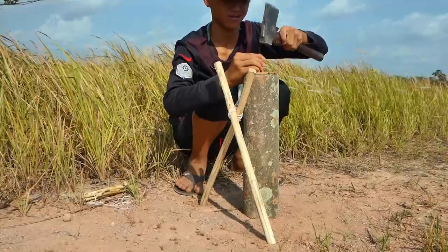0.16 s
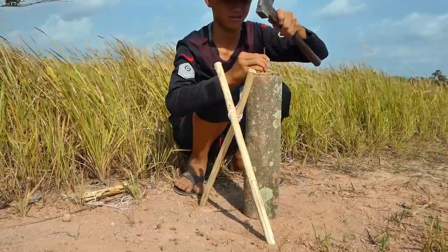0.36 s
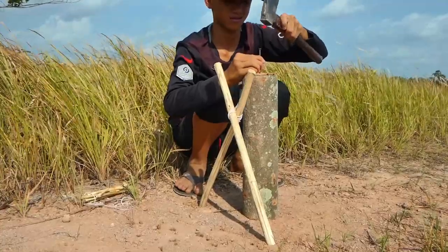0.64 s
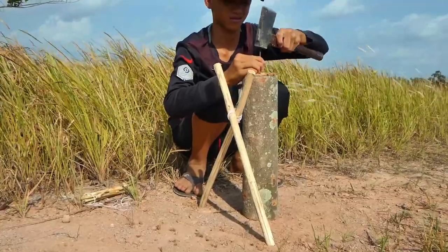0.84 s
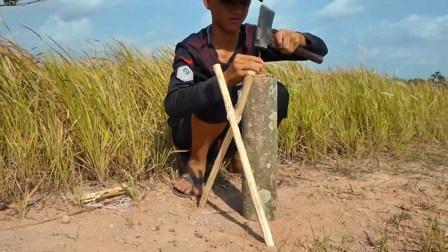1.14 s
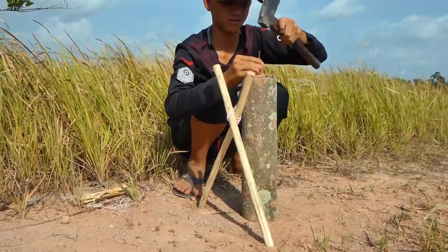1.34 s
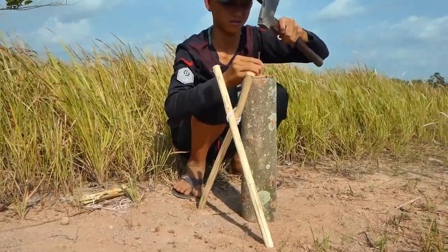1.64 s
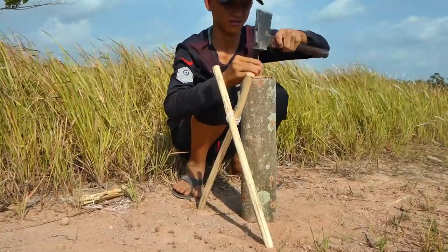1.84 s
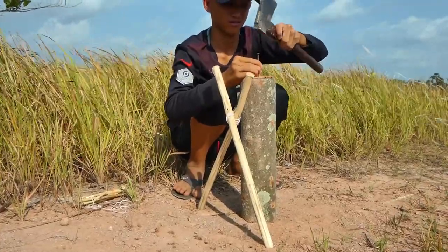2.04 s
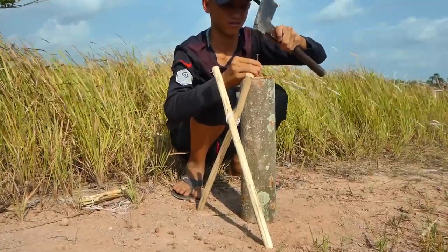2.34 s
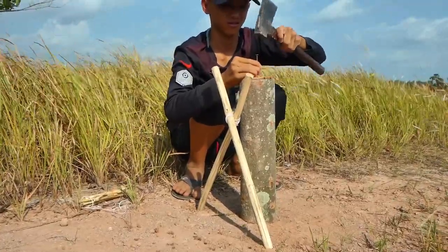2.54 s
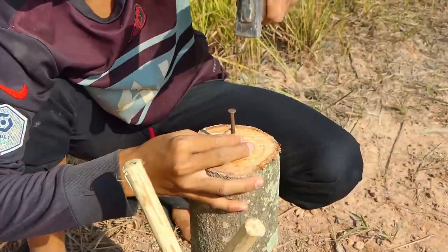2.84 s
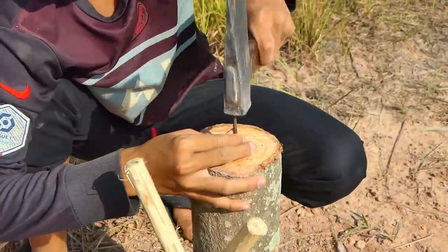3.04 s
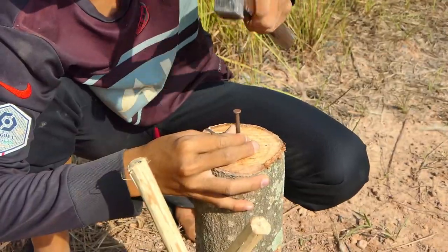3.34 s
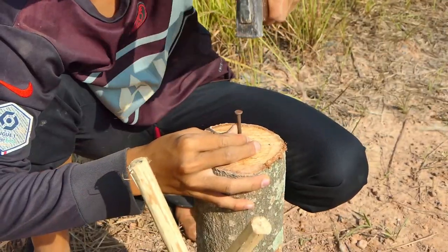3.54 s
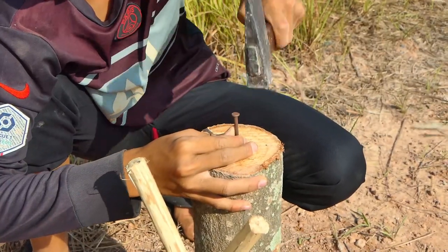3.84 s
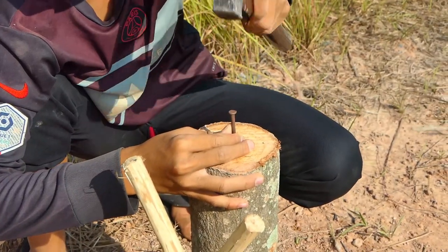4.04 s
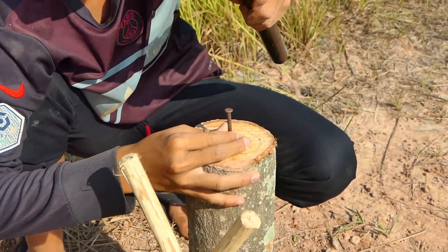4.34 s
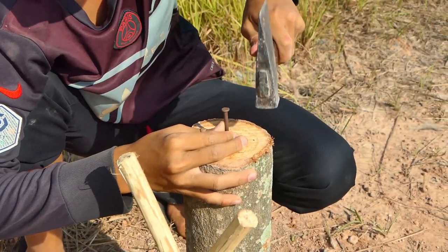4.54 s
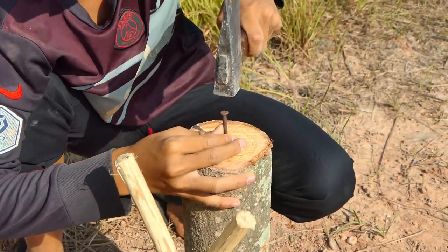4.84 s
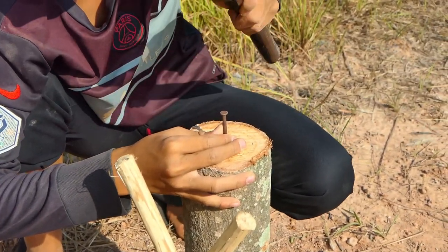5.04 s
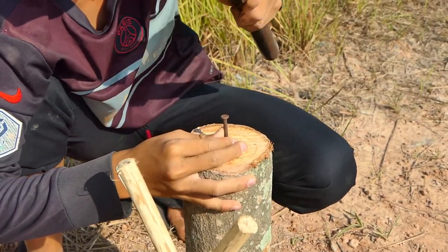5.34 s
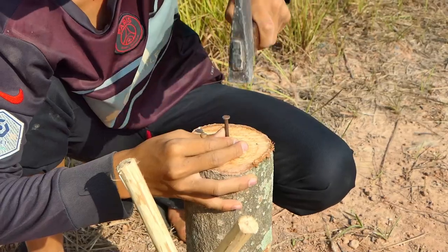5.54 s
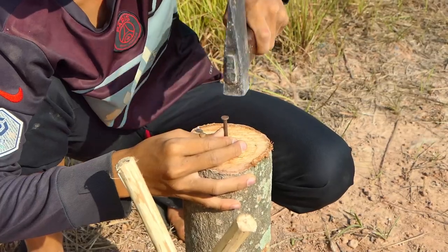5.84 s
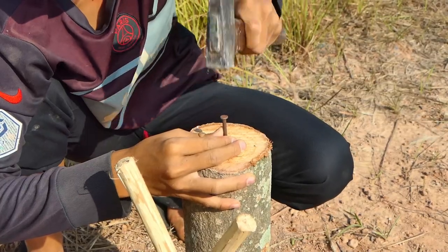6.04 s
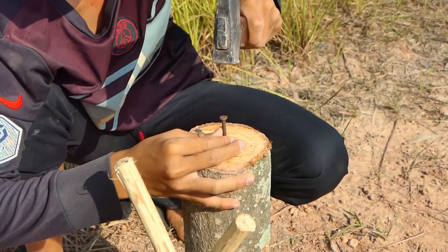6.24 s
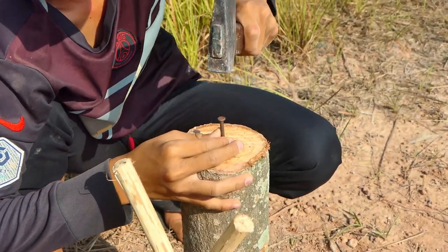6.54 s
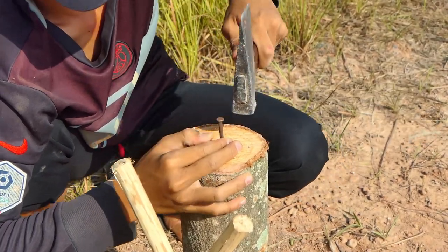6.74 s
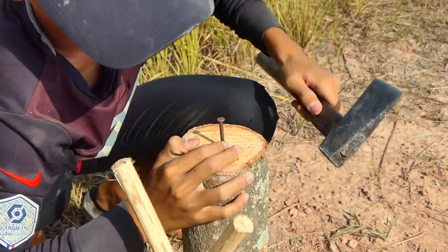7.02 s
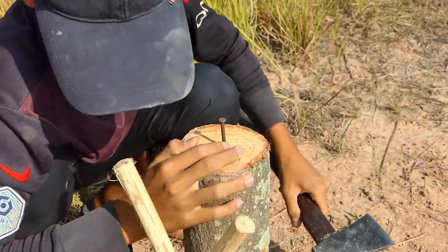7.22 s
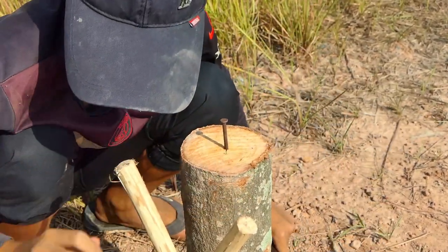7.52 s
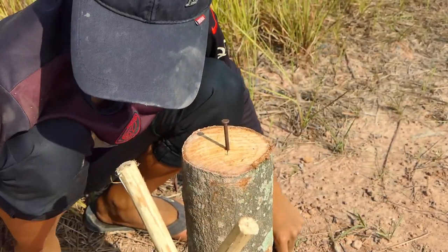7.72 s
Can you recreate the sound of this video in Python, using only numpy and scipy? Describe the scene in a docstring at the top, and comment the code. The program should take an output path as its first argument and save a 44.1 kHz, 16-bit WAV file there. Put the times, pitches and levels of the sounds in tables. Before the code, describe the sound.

A small axe hammers a nail into a log with steady, ringing blows while wind buffets the microphone and grass hisses.

```python
"""Hammering a nail in a windy field

The back of a small steel axe drives a nail into an upright log, heard first from some steps away,
then close. Each blow cracks, and axe and log ring briefly. Wind rubs the tall grass into a hiss and
buffets the two microphone openings. A soft brushing and a few faint ticks follow the last blow."""
import sys
import numpy as np
from scipy import signal
from scipy.fft import rfft, irfft, next_fast_len
from scipy.io import wavfile
from scipy.ndimage import uniform_filter1d, map_coordinates

SR = 44100
rng = np.random.default_rng(int(sys.argv[2]) if len(sys.argv) > 2 else 0)


def dump_mix(stems):
    """Bounce the given channels to the path in sys.argv[1] as a 16-bit WAV at rate SR."""
    frames = np.atleast_2d(stems).T  # one column per channel
    limited = np.clip(frames, -1, 1)  # hard clip at full scale
    pcm = np.round(limited * 32767).astype(np.int16)
    wavfile.write(sys.argv[1], SR, pcm)


N = 347508
CLOSE_FROM_S = 2.84  # the scene is heard from afar before this time, from close by after it


def amp(db):
    """Turn decibels into a factor to multiply by."""
    return 10 ** (np.asarray(db) / 20)


def unit(x):
    """Scale a signal so that its average strength (rms) is 1."""
    return x / np.sqrt(np.mean(x ** 2) + 1e-20)


def along(points, hz):
    """Read between (frequency, value) points, with every octave equally wide."""
    f, values = np.transpose(points)
    return np.interp(np.log(hz + 1), np.log(f + 1), values)


def over_time(points):
    """Join (time, value) points with straight lines, giving one value per sample."""
    times, values = np.transpose(points)
    return np.interp(np.arange(N) / SR, times, values)


def wobble(rate):
    """Two smooth random curves, each passing through `rate` random values a second."""
    knots = rng.standard_normal((2, int(N * 200 / SR)))
    coarse = np.arange(0, N + 32, 32)
    smooth = [map_coordinates(row, [coarse * min(rate, 190) / SR]) for row in knots]
    return np.array([np.interp(np.arange(N), coarse, row) for row in smooth])


def filtered(x, response):
    """Make each frequency in x louder or softer by the factor response(hz)."""
    size = next_fast_len(x.shape[-1] + 8192)
    return irfft(rfft(x, size) * response(np.fft.rfftfreq(size, 1 / SR)), size)[..., :x.shape[-1]]


def shortest_click(gain_db):
    """The shortest click that has these levels at evenly spaced frequencies (minimum phase)."""
    cepstrum = irfft(gain_db * np.log(10) / 20)
    half = len(cepstrum) // 2
    cepstrum[1:half] *= 2
    cepstrum[half + 1:] = 0
    return irfft(np.exp(rfft(cepstrum)))


def sum_and_difference(a, b):
    """Turn mid (what both ears share) and side (how they differ) into left and right, or back."""
    return np.array([a + b, a - b])


def grass():
    """Blades of grass rub together in the wind: a wide, slightly patchy hiss."""
    # how the hiss swells and fades: t/s, relative level/dB
    loudness = [(0, -52.5), (.24, -52.5), (.4, -61.5), (.58, -53.5), (1.1, -52), (1.7, -55), (1.84, -62.5),
                (1.95, -59), (2.16, -64), (2.45, -56.5), (2.72, -53), (2.8, -56.5), (2.88, -63.5),
                (3.6, -67.5), (4.4, -64.5), (4.9, -69), (5.8, -66), (6.2, -69.5), (7.2, -66.5), (7.88, -67)]
    # tone of the hiss: f/Hz, level/dB
    tone = [(60, -20), (150, -6.5), (500, -2), (1200, -1), (3000, -4.5), (6500, -7), (8300, -11.5),
            (10500, -10.5), (12500, -18.5), (15000, -26), (16500, -48)]
    # how alike left and right are: f/Hz, likeness (1 = the same)
    likeness = [(300, 1), (1400, 0.36), (3100, .6), (6800, 0.7), (15000, 0.1874)]

    def mid_side_gain(hz):
        angle = np.arccos(along(likeness, hz)) / 2
        return amp(along(tone, hz)) * [np.cos(angle), np.sin(angle)]

    spectrum = signal.stft(rng.standard_normal((2, N)), nperseg=512)[2]
    patches = uniform_filter1d(rng.standard_normal(spectrum.shape[1:]), size=6, axis=0)  # over pitch
    patches = uniform_filter1d(patches, size=12, axis=1)  # over time
    patchy_noise = signal.istft(spectrum * amp(1.1 * unit(patches)), nperseg=512)[1][:, :N]
    hiss = unit(sum_and_difference(*filtered(patchy_noise, mid_side_gain)))
    # from afar, in the grass, the highest treble is stronger
    treble = filtered(hiss, lambda hz: 1 / (1 + (11500 / (hz + 1)) ** 8))
    afar = np.arange(N) < CLOSE_FROM_S * SR
    return amp(over_time(loudness) + 3.5) * (hiss + 0.5 * treble * afar)


def rumble(gust_db):
    """The deepest air movement is smooth and follows the gusts only in part."""
    # tone of the slow pressure swings: f/Hz, level/dB
    tone = [(15, -42.5), (30, -24), (60, -7), (90, 1.5), (130, -1), (200, -29), (400, -82)]
    mid, side = filtered(rng.standard_normal((2, N)), lambda hz: amp(along(tone, hz)))
    return amp(0.66 * gust_db - 19.5) * unit(sum_and_difference(mid, 0.22 * side))


def buffeting(gust_db):
    """Air swirls at each microphone opening; the two are mixed, alike in the bass, opposed above."""
    # strong swirls of air: t/s, left boost/dB, right boost/dB
    swirls = [(0.12, 22.5, 12), (0.302, 4.5, 5), (0.373, 10, 5), (0.42, 5.5, 2.5), (1.539, 5, 10.5),
              (1.804, 10, 5), (2.014, 7.5, 4.5), (2.076, 5, 7.5), (2.179, 7.5, 2), (3.07, 7, 6),
              (3.194, 12, 2.5), (3.28, 10.5, 16.5), (3.399, 3.5, 6.5), (3.473, 5, 14), (3.678, 7, 6.5),
              (3.957, 6.5, 4), (4.45, 12, 5.5), (4.712, 7, 9), (5.71, 12.5, 9), (5.955, 9.5, 6.5),
              (6.138, 16.5, 4), (6.751, 3, 9), (7.288, 5, 10), (7.779, 4, 4.5)]
    # tone of left plus right: f/Hz, level/dB
    mid_tone = [(20, -61.5), (40, -35), (80, -12.5), (150, 1.5), (290, -5), (480, -17), (700, -25),
                (1300, -38.5), (3000, -62.5), (7000, -92)]
    # tone of left minus right: f/Hz, level/dB
    side_tone = [(20, -69), (35, -41.5), (130, -7.5), (260, -8.5), (400, -13), (650, -16), (1000, -26),
                 (3000, -53.5), (7000, -92.5)]
    t, swirl_s = np.arange(N) / SR, 0.011
    churn = 0.32 * wobble(7.3).mean(0) + 0.36 * wobble(17) + 0.78 * wobble(65)
    lumps_db = 6.27 * np.tanh(churn)  # the churning swells only so far
    for s, left_db, right_db in swirls:
        near = slice(max(round((s - .06) * SR), 0), round((s + .06) * SR))
        lumps_db[:, near] += np.exp(-((t[near] - s) / swirl_s) ** 2) * [[left_db], [right_db]]
    tone = lambda hz: amp([along(mid_tone, hz), along(side_tone, hz)])
    highs = lambda hz: 1 / (1 + (430 / (hz + 1)) ** 6)
    strength = lambda gain: np.sqrt(2 * np.mean(gain ** 2))
    grid_hz = np.fft.rfftfreq(4096, 1 / SR)
    large_swirls = amp(gust_db + lumps_db - 2.5) * rng.standard_normal((2, N))
    boom = filtered(sum_and_difference(*large_swirls), lambda hz: tone(hz) * (1 - highs(hz)))
    boom /= strength(tone(grid_hz)[0])
    # small, fast swirls come in sharper bursts than the large ones
    flutter_db = -66.5 + 1.42 * (gust_db + 40) + 1.13 * lumps_db + 5.17 * wobble(170)
    small_swirls = amp(flutter_db) * rng.standard_normal((2, N))
    flutter = filtered(sum_and_difference(*small_swirls), lambda hz: tone(hz) * highs(hz))
    flutter /= strength(tone(grid_hz)[1] * highs(grid_hz))
    return sum_and_difference(*(boom + flutter))


def brushing():
    """Something brushes nearby: a rough noise that swells quickly and fades more slowly."""
    t = np.arange(N) / SR
    peak_s, swell_s, fade_s = 7.042, 0.022, 0.12
    loudness = amp(-60.5) * np.exp(-np.maximum((peak_s - t) / swell_s, (t - peak_s) / fade_s))
    rough_noise = rng.standard_normal(N) * amp(3 * wobble(80)[0])
    brush = filtered(rough_noise, lambda hz: 1 / (1 + (np.log2((hz + 1) / 2100) / 0.87) ** 4))
    return loudness * unit(brush)


def faint_ticks():
    """A few faint ticks after the last blow, each a quickly dying tone mixed with noise."""
    # the ticks: t/s, relative level/dB, f/Hz
    ticks = [(6.8233, -50, 4430), (6.951, -51, 2700), (7.046, -47, 2400), (7.497, -36, 1800),
             (7.824, -46, 1550)]
    out, t = np.zeros(N), np.arange(SR // 20) / SR
    for s, db, hz in ticks:
        noisy_tone = np.sin(2 * np.pi * hz * t) + 0.48 * rng.standard_normal(len(t))
        out[round(s * SR):][:len(t)] += amp(db - 6.5 - 60 * t / 0.016) * noisy_tone
    return filtered(out, lambda hz: 1 / (1 + (hz / 7500) ** 6))


def crack_and_scatter(t, close, crack_db, dullness):
    """The sharp crack of steel on the nail, and its short scatter off the ground and grass."""
    # tone of the crack, one list from afar and one from close by: f/Hz, level/dB
    tones = [
        [(350, -42), (600, -13.5), (1000, -25.5), (1700, 0.5), (2500, -7.5), (3400, -2.5), (4600, -0.5),
         (5400, -0.5), (6800, -9), (8600, -2.5), (10500, -11), (13400, -14), (16000, -35)],
        [(350, -29.5), (600, -12.5), (1200, -14.5), (1600, -19), (2400, -10.5), (3000, -5), (3700, -3),
         (4700, -5), (5800, -9), (7100, -8), (8600, -11.5), (10000, -8), (11500, -14.5), (16000, -31)],
    ]
    hz = np.fft.rfftfreq(1024, 1 / SR)
    click = shortest_click(along(tones[close], hz) - dullness * np.log2((hz + 300) / 7000))
    click /= np.linalg.norm(click)
    fade = lambda db, fade_s: amp(db - 60 * t / fade_s)  # drops 60 dB in fade_s
    crack_shape = fade(-3, 0.0077) + fade(-11.5, 0.019) + fade(-27.5, 0.1)
    scatter_shape = fade(-23.5, 0.01596) + fade(-32.5, 0.094)
    rise = 1 - np.exp(-t / 0.00047)
    bursts = rng.standard_normal((2, len(t))) * rise * [crack_shape, scatter_shape]
    return amp(crack_db + dullness + 9.5) * signal.fftconvolve(bursts, [click], axes=1)[:, :len(t)]


def ringing(t, close, crack_db, low_hz, low_db, high_db, ping_db, clink_db, tick_db):
    """The struck axe and log shake at their own pitches, and each pitch quickly dies away."""
    # tones of axe and log, in ten groups: f/Hz, level/dB, time to fade by 60 dB/s, rise time/s
    groups = [
        [(3600, -12, .02, 0.00056), (5220, -16.5, 0.028, 0.000501), (8640, -13.5, 0.028, .0005)],
        [(1040, -2, 0.061, 0.0041), (1010, -15.5, 0.0247, 0.00551), (1097, -9.5, 0.037, 0.00087)],
        [(2032, 0.5, 0.041, 0.00074)],
        [(3050, 1.5, .04, .0005)],
        [(3350, 0.5, 0.034, 0.00066), (3360, 2, 0.022, .0004)],
        [(4516, -1, 0.043, 0.00088), (4525, -4.5, .025, .0005), (4570, -23, 0.1002, .002)],
        [(10000, 0, .2, .002)],
        [(165, 2.5, 0.036, 0.0064), (279, -3.5, 0.036, 0.00229)],
        [(2996, 2, 0.012, 0.000296), (2745, -4, 0.0057, 0.0003)],
        [(10040, 5, 0.0042, 0.00023)],
    ]
    # offsets for the groups that follow other levels, one row from afar and one from close by:
    # 2 kHz ring/dB, 3 kHz ring/dB, 3.3 kHz ring/dB, thud/dB
    offsets = [(-4, -27, -5, 10.5), (-8, -14, -7.5, -7)]
    ring_2k, ring_3k, ring_3k3, thud = offsets[close]
    group_levels = [crack_db, low_db, (crack_db + low_db) / 2 + ring_2k, clink_db + ring_3k,
                    crack_db + ring_3k3, high_db, ping_db, crack_db + thud, clink_db, tick_db]
    bends = np.ones(len(groups))
    bends[1] = low_hz / groups[1][0][0]  # the low ring moves with the hand's pressure
    tones = [(hz * bend, db + group_db, fade_s, rise_s)
             for bend, group_db, group in zip(bends, group_levels, groups)
             for hz, db, fade_s, rise_s in group]
    # the grip on axe and log shifts each tone a little from blow to blow
    level_noise, pitch_noise = rng.standard_normal((2, len(t)))
    ring = np.zeros(len(t))
    for k, (hz, db, fade_s, rise_s) in enumerate(tones):
        loudness = amp(db + 0.401 * level_noise[k] - 60 * t / fade_s) * (1 - np.exp(-t / rise_s))
        ring += loudness * np.sin(2 * np.pi * hz * (1 + 0.0044 * pitch_noise[k]) * t)
    roughness_db = 1.86 * unit(uniform_filter1d(level_noise, size=130))  # from loose contact
    return ring * amp(roughness_db)


def hammering():
    """Each time the axe meets the nail, it cracks and sets axe and log ringing."""
    # the contacts, with relative levels: t/s, crack/dB, dullness/(dB per octave), low ring f/Hz,
    # low ring/dB, high ring/dB, 10 kHz ping/dB, clink/dB, tick/dB
    blows = [(0.138, -27.5, 2.5, 994, -31.5, -22.5, -45, -25.5, -28),
             (0.559, -29.5, -4.5, 1030, -37.5, -35, -65, -32, -26),
             (0.904, -27.5, 3, 1010, -36.5, -20, -66, -28, -34),
             (1.244, -26.5, 0.5, 1030, -34.5, -26, -53, -23.5, -35),
             (1.5744, -25.5, 1, 1048, -35.5, -29.5, -70, -29, -39),
             (1.884, -30, 0, 1050, -34.5, -48, -58, -33, -46),
             (2.187, -32.5, 0.5, 1036, -40, -35, -60, -43, -47),
             (2.4821, -24, 1, 1010, -33.5, -28.5, -52, -26.5, -35),
             (2.768, -22, 0.5, 1016, -27, -30, -54, -30, -34),
             (2.8132, -60, 0, 1039, -33, -60, -72, -60, -55),
             (3.138, -21.5, 1, 1055, -23, -29, -67, -12.5, -16),
             (3.4878, -24, -1.5, 1040, -23, -34, -70, -19.5, -23),
             (3.8408, -22.5, 0, 1060, -25.5, -47, -64, -12, -18.5),
             (4.1899, -22, -1.5, 1050, -22, -24.5, -56, -15.5, -18),
             (4.5208, -23, 1.5, 1026, -29.5, -20.5, -63, -26, -15),
             (4.5657, -49, 11, 1055, -12, -56, -69, -24.5, -69),
             (4.8757, -26, 1.5, 1080, -20.5, -34, -62, -18, -22.5),
             (5.204, -22, 0.5, 1047, -21, -20.5, -64, -27.5, -19.5),
             (5.533, -22, 1, 1040, -17.5, -21, -67, -27, -20.5),
             (5.852, -22, 1, 1050, -16.5, -23, -61, -23.5, -19),
             (6.168, -23.5, 2, 1080, -11.5, -20, -66, -19, -19.5),
             (6.4385, -25.5, 3.5, 1044, -18, -20, -59, -21, -14.5),
             (6.7031, -26.5, 3.5, 1025, -18.5, -23, -63, -17.5, -15)]
    out, t = np.zeros((2, N + SR)), np.arange(SR // 6) / SR
    for s, crack_db, dullness, low_hz, *ring_levels in blows:
        close = s > CLOSE_FROM_S
        crack, scatter = crack_and_scatter(t, close, crack_db, dullness)
        ring = ringing(t, close, crack_db, low_hz, *ring_levels)
        late_ring = amp(-17.5) * np.pad(ring, (7, 0))[:len(t)]  # a faint, late copy widens the sound
        out[:, round(s * SR):][:, :len(t)] += sum_and_difference(crack + ring, scatter + late_ring)
    return out[:, :N]


def scene():
    """Add up wind, grass, hammering and the small sounds at the end."""
    # strength of the gusts at the microphone: t/s, relative level/dB
    gusts = [(0.0, -52.5), (0.12, -46.5), (0.24, -31.5), (0.4, -26), (0.48, -34.5), (0.56, -33),
             (0.65, -51.5), (0.86, -45.5), (0.96, -52), (1.12, -45), (1.43, -50), (1.52, -33), (1.76, -29),
             (1.9, -33.5), (2.08, -24.5), (2.24, -30.5), (2.48, -47), (2.66, -51.5), (2.86, -40.5),
             (3.03, -27.5), (3.2, -34), (3.52, -29), (3.76, -33.5), (3.91, -26), (4.02, -37.5),
             (4.16, -29.5), (4.4, -30), (4.5, -33), (4.72, -32.5), (4.81, -25.5), (5.2, -44), (5.44, -34.5),
             (5.56, -41.5), (5.7, -35.5), (5.91, -43.5), (6.0, -33), (6.14, -42), (6.3, -56.5), (6.41, -49),
             (6.5, -29.5), (6.64, -40.5), (6.72, -37), (7.0, -48), (7.2, -50), (7.25, -35.5), (7.36, -28),
             (7.45, -38), (7.54, -34.5), (7.68, -39.5), (7.88, -25)]
    gust_db = over_time(gusts)
    wind = buffeting(gust_db) + rumble(gust_db) + grass()
    balance = amp([[-.2], [.2]])  # the right side is a touch louder
    return (wind + hammering()) * balance + brushing() + faint_ticks()


def record(dry):
    """Cut away the very highest treble."""
    top_hz = 16700
    return filtered(dry, lambda hz: 1 / (1 + (hz / top_hz) ** 120))


dry = scene()
out = record(dry)
dump_mix(out)
```